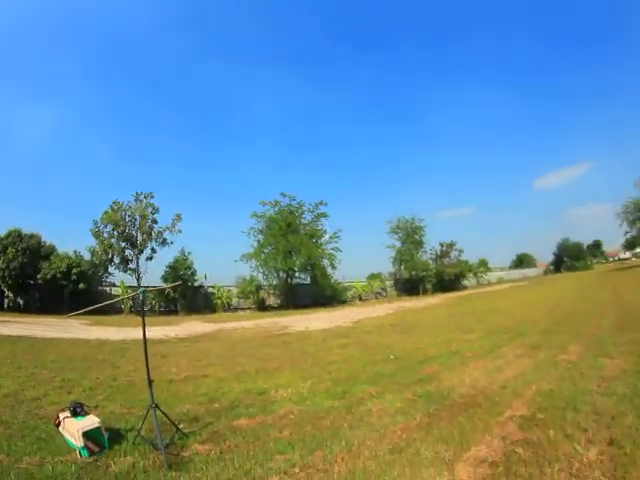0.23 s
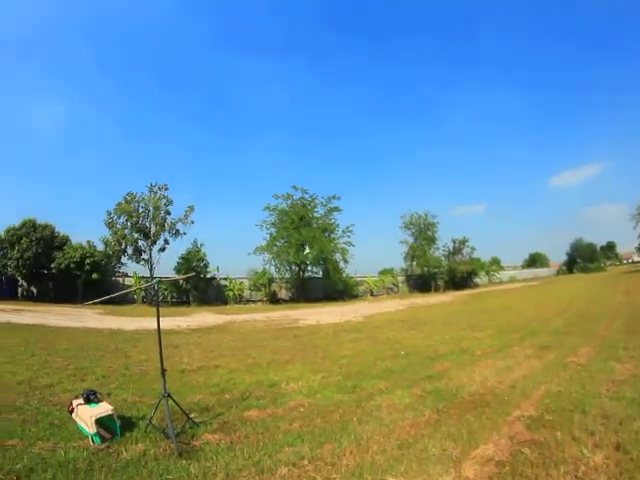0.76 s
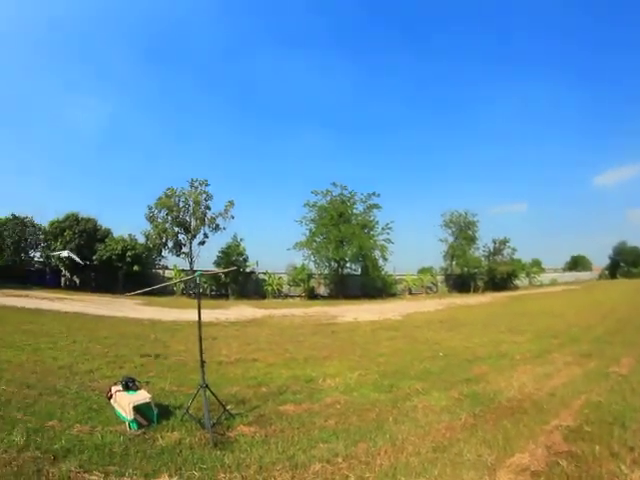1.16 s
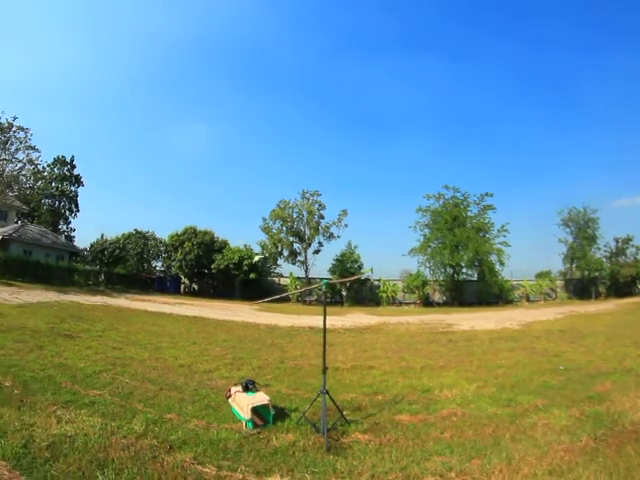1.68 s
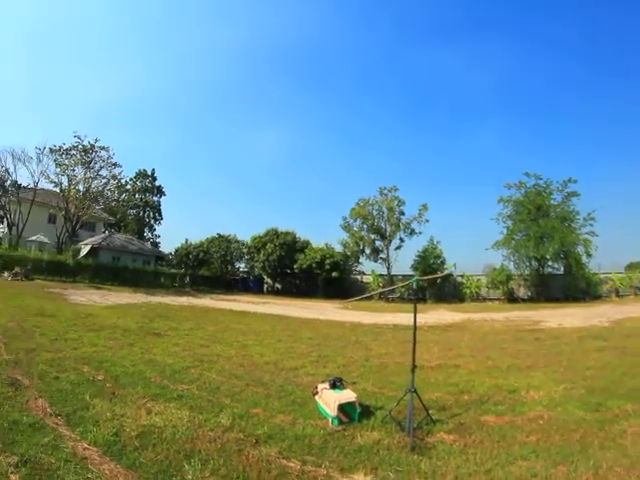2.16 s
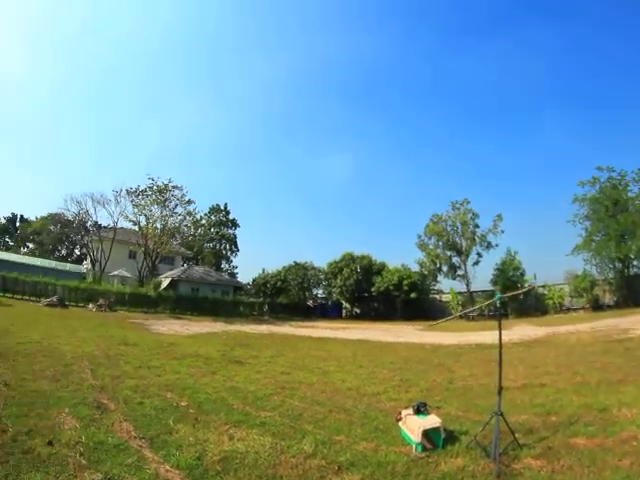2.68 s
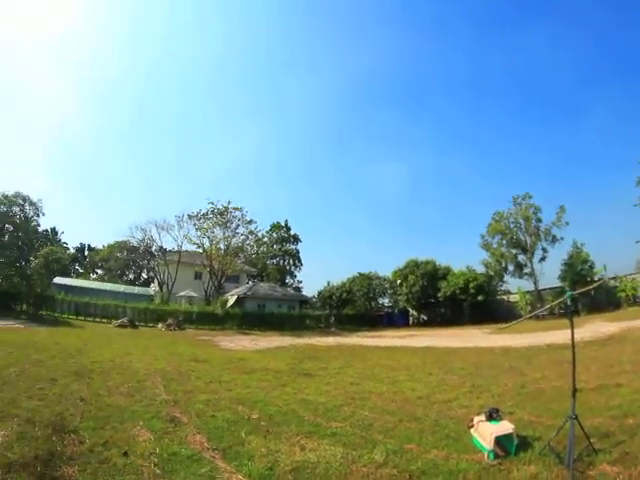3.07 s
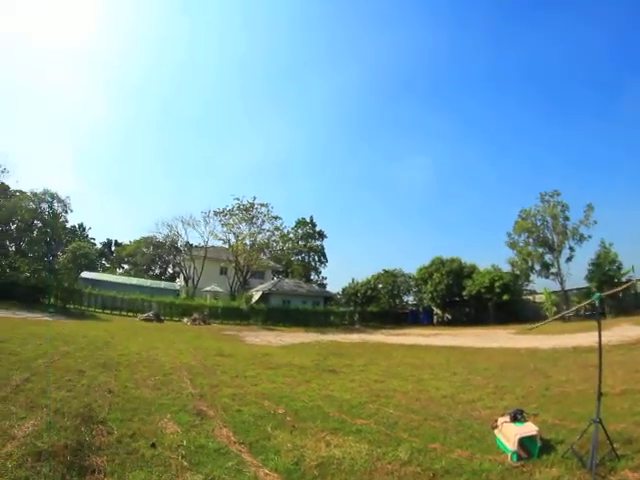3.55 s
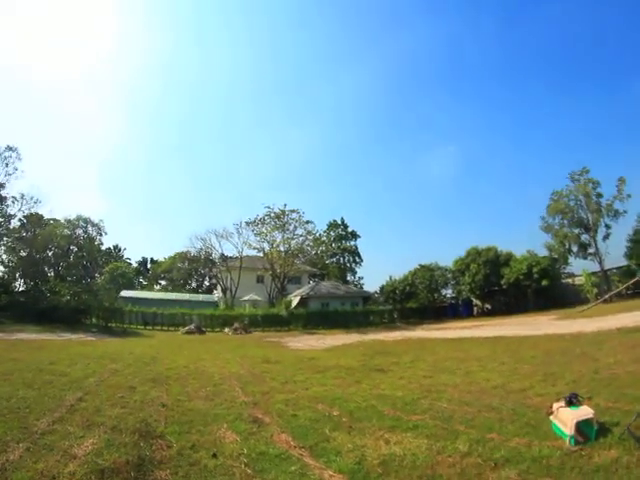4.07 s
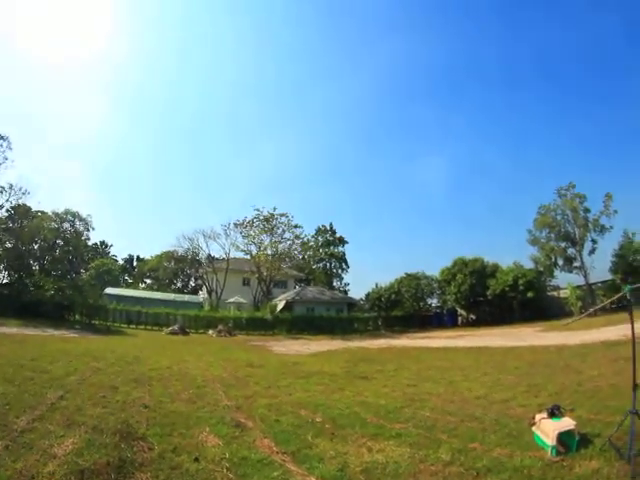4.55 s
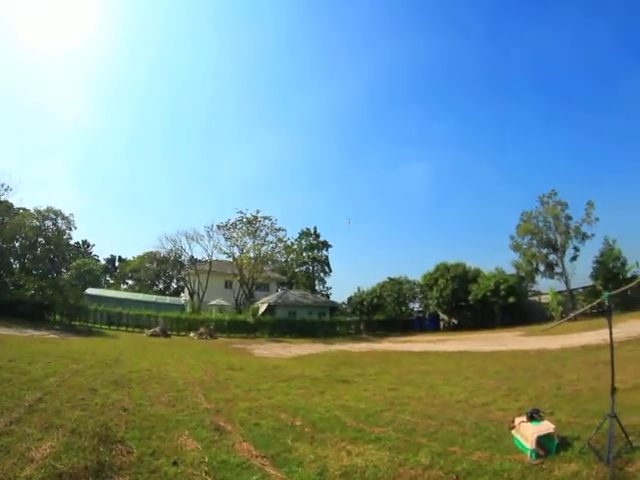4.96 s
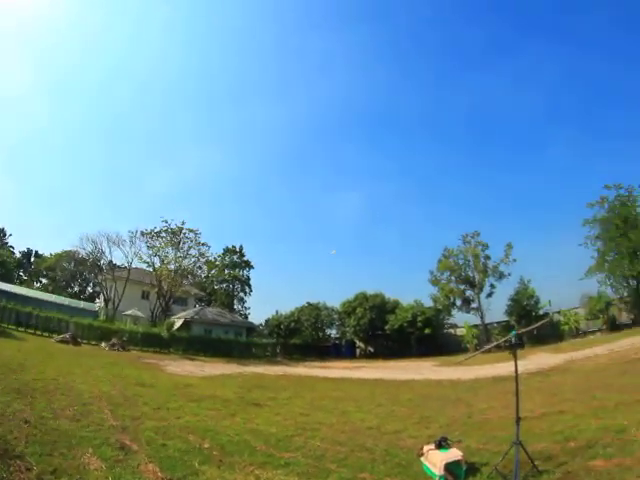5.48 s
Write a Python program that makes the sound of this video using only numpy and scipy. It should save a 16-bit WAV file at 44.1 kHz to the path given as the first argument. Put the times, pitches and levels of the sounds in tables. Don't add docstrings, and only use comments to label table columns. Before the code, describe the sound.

Cockatoos burst out nearby with leaping whistles, buzzy rasps and hoarse climbing screeches, echoing off trees, with distant birds, soft hum and wind buffets.

```python
import sys
import numpy as np
from scipy import signal
from scipy.fft import rfft, irfft
from scipy.io import wavfile
from scipy.ndimage import uniform_filter1d

SR = 44100
rng = np.random.default_rng(int(sys.argv[2]) if len(sys.argv) > 2 else 0)


def volts_from_db(level):
    exponent = np.asarray(level, float) / 20
    return 10 ** exponent


def waveform_to_disk(signal):
    frames = np.transpose(np.atleast_2d(signal))
    scaled = np.clip(frames, -1, 1) * 32767
    samples = np.round(scaled).astype(np.int16)
    wavfile.write(sys.argv[1], SR, samples)


N = 252252

# start_db, middle_db, end_db, share of the glide done by the middle
SWELL, FADE = (-7, -5, 0, .3), (-0.5, -9.5, -16, 1.12)
HOLD, BLIP = (0.47, 0.71, -2, 0.74), (-13.5, -0.5, -9, 1.5)


def shaped_notes(rows, shape, *held):
    start_db, middle_db, end_db, share = shape
    calls = []
    for s, length, first, last, db in rows:
        middle_hz = first + share * (last - first)
        calls.append([(s, first, db + start_db, *held),
                      (s + length / 2, middle_hz, db + middle_db, *held),
                      (s + length, last, db + end_db, *held)])
    return calls


def unroll(call, edge_s):
    s, *columns = np.transpose(call)
    first, last = round((s[0] - edge_s / 2) * SR), round((s[-1] + edge_s / 2) * SR)
    at = np.arange(max(first, 0), min(last, N))
    gate = np.clip(np.minimum(at - first, last - at) / (edge_s * SR), 0, 1)
    return at, np.sin(gate * np.pi / 2) ** 2, [np.interp(at / SR, s, c) for c in columns]


def at_hz(points, hz):
    points_hz, values = np.transpose(points)
    return np.interp(np.log(hz + 1e-9), np.log(points_hz), values)


def in_time(rows):
    s, *columns = np.transpose(rows)
    return [np.interp(np.arange(N) / SR, s, c) for c in columns]


def coloured(points):
    hz = np.arange(N // 2 + 1) * SR / N
    noise = irfft(rfft(rng.standard_normal(N)) * volts_from_db(at_hz(points, hz)), N)
    return noise / np.sqrt(np.mean(noise ** 2) + 1e-20)


def drift(rate):
    knots = rng.standard_normal(2000)
    return np.interp(np.arange(N) / SR * rate, np.arange(len(knots)), knots)


def filtered(x, order, hz, kind="low"):
    return signal.sosfilt(signal.butter(order, hz, kind, fs=SR, output="sos"), x)


def whistles(calls, partials_db, edge_s, flutter_db, wobble, follows=0):
    full_voice_db = -19.5
    out, unsteady = np.zeros(N), 1 + wobble * drift(120)
    for call in calls:
        at, gate, (hz, db) = unroll(call, edge_s)
        hz = uniform_filter1d(hz, size=101, mode="nearest") * unsteady[at]
        phase = 2 * np.pi * np.cumsum(hz) / SR
        softness_db = 1.3 * follows * np.clip(db.max() - full_voice_db, -20, 0)
        tone = np.zeros(len(at))
        for k, partial_db in enumerate(partials_db):
            audible = (k + 1) * hz < .45 * SR
            tone += volts_from_db(partial_db + k * softness_db) * np.sin((k + 1) * phase) * audible
        out[at] += np.sqrt(2) * volts_from_db(db) * gate * tone
    return out * volts_from_db(flutter_db * drift(150))


# start_s, pitch_hz, level_db
LONG_WHISTLES = [
    [(1.489, 5202, -22), (1.495, 5400, -26), (1.503, 5497, -33), (1.519, 5310, -15.5), (1.527, 5222, -15)],
    [(1.529, 5074, -28.5), (1.541, 5450, -15), (1.555, 5828, -19.5), (1.573, 5534, -13.5),
     (1.581, 5450, -19.5)],
    [(1.744, 5430, -22.5), (1.75, 5565, -20), (1.784, 5347, -15.5), (1.789, 5400, -10)],
    [(1.809, 5776, -21), (1.815, 5745, -24.5), (1.837, 5715, -13), (1.848, 5458, -16)],
    [(4.268, 5200, -35), (4.285, 5250, -27.5), (4.3, 5420, -19.5), (4.322, 5300, -27), (4.358, 5580, -25.5),
     (4.366, 5150, -20.5), (4.385, 5400, -33), (4.45, 5437, -46)],
]
# start_s, pitch_hz, level_db
LOWER_WHISTLES = [
    [(1.463, 4004, -26.5), (1.475, 4136, -28), (1.484, 4260, -24.5), (1.489, 5010, -19.5)],
    [(1.719, 4213, -20), (1.727, 4224, -19), (1.735, 4250, -8.5), (1.741, 4486, -15.5),
     (1.745, 5150, -27.5)],
    [(5.6, 4570, -13), (5.604, 4650, -23), (5.614, 4982, -22), (5.628, 4696, -19.5), (5.698, 4954, -17.5),
     (5.706, 4740, -40.5)],
]
# start_s, length_s, first_hz, last_hz, peak_db
SWELLING_WHISTLES = [(1.543, 0.0118, 4220, 4530, -19), (1.7, 0.0258, 2777, 4197, -27),
                     (2.267, 0.0243, 4484, 4391, -17.5), (2.42, 0.0515, 3830, 4214, -23.5),
                     (2.48, 0.0099, 6100, 6310, -31.5), (2.515, 0.014, 5060, 4848, -23),
                     (2.55, 0.025, 5179, 5295, -33.5), (5.588, 0.0131, 3336, 3689, -17)]
# start_s, length_s, first_hz, last_hz, peak_db
FADING_WHISTLES = [(1.533, 0.0097, 4335, 4146, -20.5), (1.579, 0.0059, 4197, 4410, -13),
                   (1.79, .01, 5018, 5176, -11), (1.847, 0.0065, 4162, 4437, -12.5),
                   (2.468, 0.0234, 5053, 5050, -21.5), (2.501, 0.0136, 4136, 4400, -22),
                   (2.501, 0.0158, 6330, 5730, -28)]
WHISTLE_PARTIALS = [1.5, -22.5, -30.5]


def near_whistles():
    long_notes = list(LONG_WHISTLES) + list(LOWER_WHISTLES)
    short_notes = shaped_notes(SWELLING_WHISTLES, SWELL) + shaped_notes(FADING_WHISTLES, FADE)
    out = whistles(long_notes, WHISTLE_PARTIALS, edge_s=.003, flutter_db=1.3, wobble=0.00446)
    return out + whistles(short_notes, WHISTLE_PARTIALS, edge_s=.003, flutter_db=2.5,
                          wobble=0.00594, follows=0.86)


# start_s, pitch_hz, level_db
YELP_WHISTLE = [(2.883, 1726, -20), (2.889, 1740, -14.5), (2.92, 1782, -17), (2.926, 2000, -17),
                (2.931, 2080, -15)]


def yelp_whistle():
    return whistles([YELP_WHISTLE], [1, -28], edge_s=.003, flutter_db=1.3, wobble=0.00367)


def pulses(hz, rough, colour_db, jitter, shared, spread, half=0, pace=1):
    multiples = np.arange(2, int(31000 / hz.max()) + 1)[:, None] / 2
    chance = rng.standard_normal((len(multiples) + 2, 400))
    cycle = pace * np.cumsum(hz) / SR
    knots = np.arange(chance.shape[1])
    per_cycle = np.array([np.interp(cycle, knots, row) for row in chance])
    rough, shared = np.clip(rough, 0, 1), np.clip(shared, 0, 1)
    hz = hz * (1 + jitter * rough * per_cycle[0])
    phase = 2 * np.pi * np.cumsum(hz) / SR
    rough = np.clip(rough + .03 * multiples * hz / 1000, 0, 1)
    disorder = shared * per_cycle[1] + (1 - shared) * per_cycle[2:]
    strength = 1 - rough + rough * disorder
    strength = strength * np.where(multiples % 1, half, 1)
    ringing = spread * chance[2:, -1:]
    partials = volts_from_db(colour_db(multiples * hz)) * strength * np.cos(multiples * phase + ringing)
    stack = np.sum(partials, axis=0)
    return stack / np.sqrt(uniform_filter1d(stack ** 2, size=801, mode="reflect") + 1e-12)


# start_s, pulse_rate_hz, level_db
LONG_SCREECHES = [
    [(2.722, 243.5, -38), (2.733, 245.9, -36), (2.738, 251, -26.5), (2.75, 259.5, -22),
     (2.78, 283.8, -20.5), (2.805, 280.4, -22), (2.825, 295.2, -27)],
    [(3.112, 451.8, -30), (3.142, 454.7, -16), (3.2, 468.7, -19), (3.256, 499.2, -16.5), (3.33, 515.3, -18),
     (3.385, 534.9, -16), (3.394, 541.6, -20)],
    [(4.268, 432.2, -22), (4.3, 457.2, -18), (4.4, 481.6, -18.5), (4.5, 508.2, -18), (4.6, 485, -19.5),
     (4.64, 457, -24)],
]
# start_s, length_s, first_hz, last_hz, peak_db
YELPS = [
    (2.828, 0.059, 689.7, 794.5, -22),
    (2.885, 0.0444, 863, 909.7, -26),
    (2.922, 0.0081, 902, 1060, -17),
]
# start_s, length_s, first_hz, last_hz, peak_db
CROAKS = [
    (2.932, 0.0293, 364.4, 351, -16),
    (3.045, 0.065, 718.3, 677, -23),
]


def screech_calls():
    calls = shaped_notes(YELPS, (-1.2, -1.8, 2, 0.43), .5, -8, 0)
    calls += shaped_notes(CROAKS, (-0.5, -7, -10, -0.05), .75, -7, 0)
    loud_rough, full_effort_db, half_lines = (.55, .45, .55), (-18.5, -6, -5), (.15, .45, .5)
    opening_s, opening_db, rough_per_db = 0.0782, -10, .045
    for call, rough, full_db, half in zip(LONG_SCREECHES, loud_rough, full_effort_db, half_lines):
        s, hz, db = np.transpose(call)
        effort_db = full_db + opening_db * np.clip(1 - (s - s[0]) / opening_s, 0, 1)
        frayed = rough + rough_per_db * (db.max() - db)
        calls.append(np.transpose([s, hz, db, frayed, effort_db, half + 0 * s]))
    return calls


# frequency_hz, level_db
THROAT = [(500, -31), (800, -21), (1050, -10.5), (1480, -2), (1700, -2), (1980, -0.5), (2350, -11),
          (2740, -2.5), (3200, -9), (3800, -7.5), (5000, -14), (7000, -23), (15000, -53)]


def screeches():
    out = np.zeros(N)
    for call in screech_calls():
        at, gate, (hz, db, rough, effort_db, half) = unroll(call, edge_s=.006)
        tilt_db = effort_db - 12 * np.clip(1 - 2 * rough, 0, 1)

        def throat_db(f):
            return at_hz(THROAT, f) + tilt_db * np.clip(np.log2(f / 2000), 0, None)

        voice = pulses(hz, .85 * rough, throat_db, jitter=.03, shared=0.23, spread=np.pi,
                       half=half, pace=.4)
        out[at] += volts_from_db(db + 1.17) * gate * voice
    return filtered(out, 4, 820, "high")


# start_s, length_s, pulse_rate_hz, peak_db,
# beak_hz
RISING_BUZZ = [
    (1.463, 0.0084, 986, -37, 4000),
    (1.527, 0.0164, 1009, -21.5, 5610),
    (1.797, 0.014, 1038, -17, 5840),
]
STEADY_BUZZ = [(1.782, 0.0167, 2650, -24.5, 8100), (2.289, 0.023, 1840, -17, 4350),
               (2.358, 0.0314, 1303, -21.5, 4040), (4.322, 0.017, 1067, -27, 6400),
               (4.366, 0.0104, 1050, -24.5, 4200), (5.625, 0.0117, 1174, -22, 5950),
               (5.625, 0.012, 1184, -23, 3600)]
OPENING_BUZZ = [
    (2.2, 0.036, 545.6, -21.5, 3730),
]
HOARSE_BUZZ = [
    (2.232, 0.0355, 690.3, -20, 4125),
    (2.43, 0.0383, 1340, -31.5, 5380),
]
CLUCKS = [
    (1.582, 0.0284, 883, -26.5, 1263),
    (1.582, 0.0357, 880, -27, 3550),
    (1.852, 0.0193, 864.3, -26, 1327),
    (1.852, 0.0223, 846.4, -27.5, 3620),
]
RASPS = [(0, 0.0505, 603.4, -38.5, 2114), (.13, 0.098, 600, -48, 4470), (.5, 0.1046, 604, -48, 4530),
         (2.311, 0.0527, 692.5, -23.5, 4356), (2.385, 0.0517, 1337, -32.5, 4590),
         (2.53, 0.076, 1012, -38.5, 5045), (5.655, 0.054, 904.4, -33, 3270)]
DYING_RASPS = [
    (1.579, 0.0142, 914.7, -13, 5270),
    (1.846, 0.011, 870, -12.5, 5360),
    (2.6, 0.022, 1040, -40.5, 5000),
]
SWELLING_RASPS = [
    (1.7, 0.01962, 820, -18.5, 4420),
    (4.028, 0.038, 686, -31.5, 3220),
    (4.243, 0.023, 706, -29, 4980),
    (5.709, 0.011, 1170, -16, 3920),
]


def squawk_calls():
    rise, creep, sag = 5.21, 0.78, -4
    cluck_shape = (0.5, -1.5, -6, .5)
    kinds = [(RISING_BUZZ, HOLD, rise, .2), (STEADY_BUZZ, BLIP, creep, .2),
             (OPENING_BUZZ, SWELL, rise, .2), (HOARSE_BUZZ, HOLD, creep, .5),
             (CLUCKS, cluck_shape, sag, .15), (RASPS, HOLD, creep, .9),
             (DYING_RASPS, FADE, 0, .9), (SWELLING_RASPS, SWELL, rise, .9)]
    calls = []
    for rows, shape, rate, rough in kinds:
        for s, length, hz, db, beak_hz in rows:
            last_hz = hz * (1 + rate * length)
            calls += shaped_notes([(s, length, hz, last_hz, db)], shape, rough, beak_hz)
    return calls


def squawks():
    out = np.zeros(N)
    for call in squawk_calls():
        at, gate, (hz, db, rough, beak_hz) = unroll(call, edge_s=.003)

        def beak_db(f):
            octaves = np.log2(f / beak_hz)
            below = np.clip(30 * octaves + 9, -30, 0)
            above = -17 * np.clip(octaves, 0, None) - 16 * np.clip(octaves - .8, 0, None)
            return below + above

        voice = pulses(hz, rough, beak_db, jitter=.06, shared=0.254, spread=1.0)
        out[at] += volts_from_db(db) * gate * voice
    return out


# start_s, length_s, first_hz, last_hz, peak_db
FAR_SWELLING = [(.06, 0.0209, 3846, 3620, -36), (.17, 0.0376, 2628, 2767, -41.5),
                (.38, 0.0515, 3720, 3734, -36), (.865, 0.0107, 2504, 2890, -44.5),
                (1.49, 0.077, 3590, 4032, -33.5), (4.17, 0.0738, 1118, 1269, -28),
                (5.55, 0.028, 3803, 3440, -36.5), (5.66, 0.041, 2525, 2811, -35)]
FAR_FADING = [(.29, 0.0576, 3939, 3990, -37.5), (.39, 0.032, 1834, 1715, -45),
              (.44, 0.125, 3645, 3830, -37), (1.04, 0.1365, 3810, 3990, -41),
              (1.797, 0.0118, 1014, 1121, -26), (1.92, 0.111, 3319, 3379, -39.5),
              (2.311, 0.0498, 2830, 2690, -26), (2.37, 0.247, 2893, 2774, -42)]
FAR_HELD = [(0, 0.0822, 3964, 3810, -42.5), (.1, 0.21, 3786, 3925, -47), (.31, 0.12, 2640, 2055, -46.5),
            (.365, 0.06, 4350, 4387, -48.5), (.412, 0.0196, 3700, 3023, -37), (.9, 0.144, 3890, 3792, -45),
            (3.06, 0.063, 2960, 2964, -29.5), (3.16, 0.059, 2710, 2724, -26),
            (3.94, 0.0114, 2530, 2960, -44), (3.952, 0.0963, 4050, 4030, -34),
            (4.075, 0.054, 4120, 3833, -34), (3.98, 0.056, 8115, 8160, -73),
            (4.14, 0.0575, 2833, 2590, -31.5), (4.238, .03, 4300, 2910, -36.5),
            (4.255, .02, 4000, 4300, -34.5), (2.565, 0.031, 6400, 6160, -40.5),
            (2.64, 0.0093, 6300, 6252, -42), (5.458, 0.102, 3769, 3768, -39.5)]
CHIRPS = [
    (.43, 0.0575, 6930, 8260, -51),
    (1.95, .08, 6480, 8750, -52),
    (3.68, .075, 6650, 8510, -52.5),
    (3.81, 0.0802, 6638, 8273, -45),
]
FAR_PARTIALS = [2, -25.5]


def far_whistles():
    calls = shaped_notes(FAR_SWELLING, (-7, -5, 0.5, 1.45))
    calls += shaped_notes(FAR_FADING, (0, -8, -13, 0.97))
    calls += shaped_notes(FAR_HELD, (0.28, 1.95, -0.35, 0.94))
    calls += shaped_notes(CHIRPS, (-9.5, -6, -1, 0.25))
    return whistles(calls, FAR_PARTIALS, edge_s=.008, flutter_db=3.0, wobble=0.00543)


# start_s, length_s, first_hz, last_hz, peak_db
SLIDES = [
    (.09, 0.125, 2700, 1720, -46.5),
    (.47, 0.108, 2624, 1801, -44.5),
    (1.01, .12, 2649, 1839, -41),
    (4.06, 0.17, 2889, 1754, -35.5),
]
SLIDE_PARTIALS = [-1, 0, -27, -26]


def far_slides():
    calls = shaped_notes(SLIDES, (-4, 0, -2, .45))
    return whistles(calls, SLIDE_PARTIALS, edge_s=.016, flutter_db=4.0, wobble=0.0079)


def scattered(x):
    t = np.arange(SR // 4) / SR
    spray = volts_from_db(-31 - 20 * t / 0.0527) * rng.standard_normal(len(t))
    return volts_from_db(-1.5) * x + signal.fftconvolve(x, spray)[:N]


def slap(x, level_db):
    delay_s = .066
    late = np.concatenate([np.zeros(round(delay_s * SR)), x])[:N]
    return volts_from_db(level_db) * filtered(late, 2, 2800)


# frequency_hz, fall_s
TAIL = [(500, 0.402), (2000, 0.706), (5500, 0.6724), (9000, 0.703), (16000, 0.84)]


def tree_line(x, tail_db):
    starts_s, build_s = .03, .045
    t = np.arange(SR) / SR
    white, response = rng.standard_normal(SR), np.zeros(SR)
    edges = 400 * 2 ** np.arange(0, 5.6, .5)
    onset = np.clip((t - starts_s) / build_s, 0, 1)
    for low, high in zip(edges, edges[1:]):
        band = filtered(white, 2, [low, high], "band")
        fall_s = at_hz(TAIL, np.sqrt(low * high))
        response += band * onset * volts_from_db(tail_db - 60 * t / fall_s)
    response = filtered(response, 2, 7500)
    return signal.fftconvolve(x, response)[:N]


# time_s, rumble_db
WIND = [(0, -46), (1.9, -45), (2.15, -45), (2.5, -48.5), (3.25, -44.5), (3.35, -37), (3.45, -48),
        (3.62, -40), (3.75, -32), (3.95, -41), (4.4, -41.5), (4.52, -30), (4.7, -43.5), (4.88, -32),
        (5.12, -44.5), (5.35, -34), (5.72, -38)]
# start_s, peak_db, pitch_hz
BUFFETS = [(1.945, -12.5, 107.8), (2.028, -31.5, 65.4), (2.07, -26, 138), (3.301, -29, 90.4),
           (3.327, -26, 98), (3.369, -24, 134), (3.397, -23, 100.2), (3.706, -14.5, 151),
           (3.719, -19.5, 140), (3.745, -24, 108), (3.764, -22, 115), (3.782, -26, 120), (3.81, -24, 92),
           (3.828, -25.5, 234), (3.868, -26.5, 156), (4.003, -27.5, 70.15), (4.265, -17.5, 184),
           (4.49, -22, 124.5), (4.51, -18.5, 159.3), (4.54, -30, 64), (4.617, -22, 89), (4.829, -37, 107),
           (5.017, -26.5, 96.9), (5.258, -23, 77), (5.317, -22, 72.6), (5.401, -23.5, 162),
           (5.524, -22.5, 116), (5.681, -23, 115)]
# frequency_hz, level_db (per Hz)
RUMBLE = [(8.8, -54.5), (15, -22), (43, -1.5), (75, 3), (112, -1.5), (200, -6), (300, -14), (450, -35.5),
          (780, -50.5), (1320, -120)]


def wind():
    rumble_db = in_time(WIND)[0] + 3.68 * drift(13) + 1.17 * drift(40)
    out = volts_from_db(rumble_db) * coloured(RUMBLE)
    t = np.arange(round(.08 * SR)) / SR
    for s, db, hz in BUFFETS:
        swell = t * hz / 0.391 * np.exp(1 - t * hz / 0.4426)
        push = np.sin(2 * np.pi * hz * t) * swell
        at = round(s * SR)
        out[at:at + len(t)] += (volts_from_db(db) * push)[:N - at]
    return filtered(out, 1, 35, "high")


# start_s, peak_db
TICKS = [
    (0.7874, -43),
    (0.8655, -42),
]


def ticks():
    out, t = np.zeros(N), np.arange(N) / SR
    for s, db in TICKS:
        out += volts_from_db(db) * (t >= s) * np.exp(-np.clip(t - s, 0, 1) / 0.0034)
    return out * rng.standard_normal(N)


# time_s, level_db, treble_db
HUM = [(0, -51, 6.5), (.5, -46.5, 2), (.9, -45, 2), (1.3, -45, 0), (1.9, -46.5, -2), (2.7, -46, -4),
       (3.6, -44.5, -7.5), (4.4, -41.5, 4.5), (5.2, -40.5, -13), (5.72, -45.5, 4)]
# frequency_hz, level_db (per Hz)
FIELD = [(120, -15), (200, -17.5), (268, -4.5), (299, -5), (322, -4), (601, -8), (646, -9.5), (851, -4.5),
         (1160, -8), (1740, -11), (2250, -16), (4110, -19.5), (14300, -46.5), (16000, -46)]


def hum_and_hiss():
    level_db, treble_db = in_time(HUM)
    hum = coloured(FIELD)
    dull = filtered(hum, 1, 900)
    hum = dull + volts_from_db(treble_db) * (hum - dull)
    sway_db = .8 * drift(5.154)
    return volts_from_db(level_db + 4.5 + sway_db) * hum + volts_from_db(-59.0) * rng.standard_normal(N)


def scene():
    near = near_whistles() + yelp_whistle() + screeches() + squawks()
    far = scattered(far_whistles() + far_slides())
    wet = slap(near, level_db=-12) + tree_line(near + volts_from_db(2.0) * far, tail_db=-28.0)
    return (near + far + wet + wind() + ticks() + hum_and_hiss())[None]


def roll_off(x):
    return signal.sosfilt(signal.butter(12, 15900, fs=SR, output="sos"), x)


def record(dry):
    mix = 0.8945 * np.tanh(dry / 0.845)
    return roll_off(mix)


dry = scene()
out = record(dry)
waveform_to_disk(out)
```